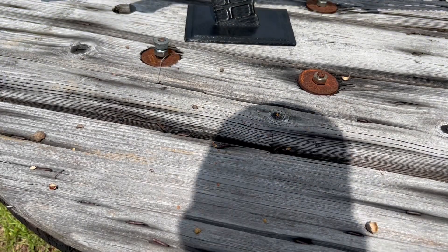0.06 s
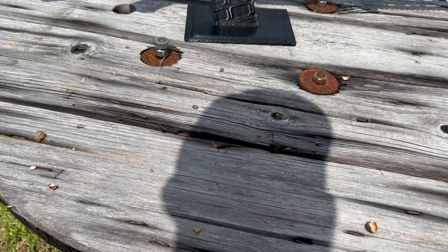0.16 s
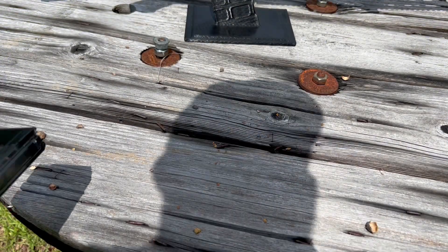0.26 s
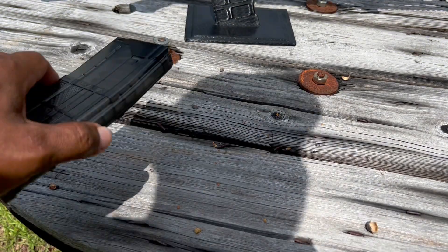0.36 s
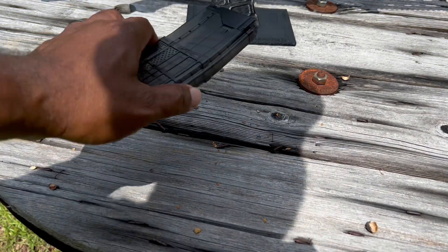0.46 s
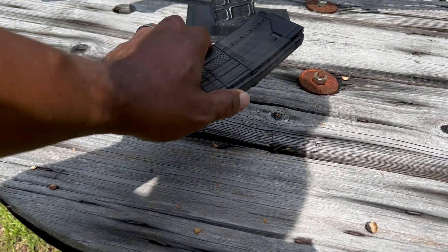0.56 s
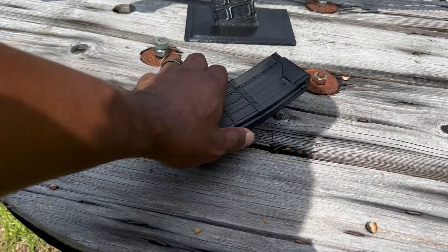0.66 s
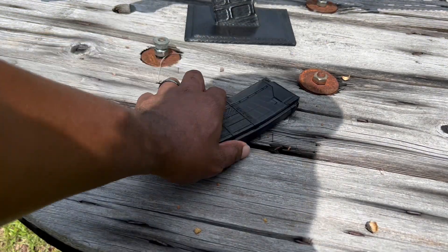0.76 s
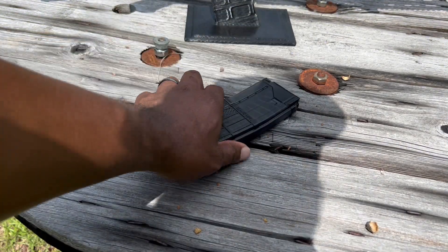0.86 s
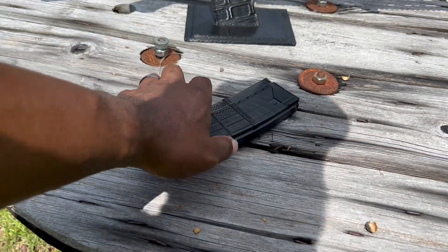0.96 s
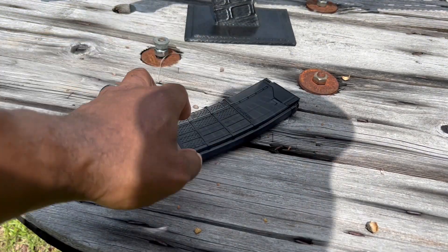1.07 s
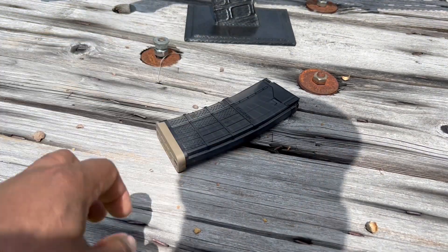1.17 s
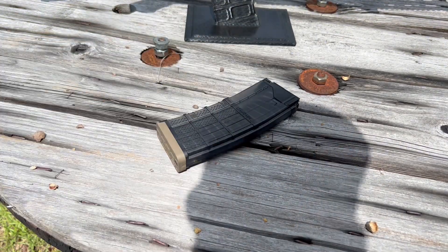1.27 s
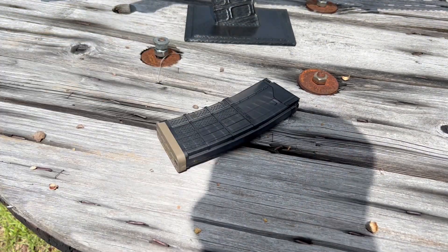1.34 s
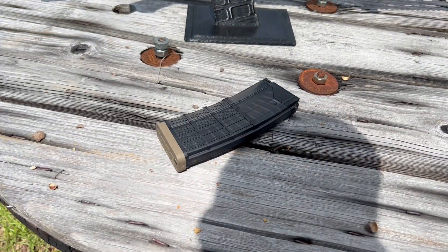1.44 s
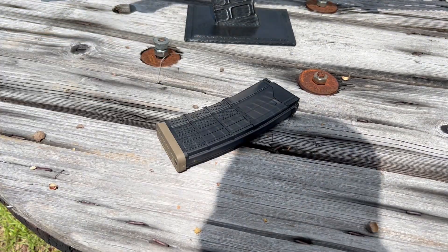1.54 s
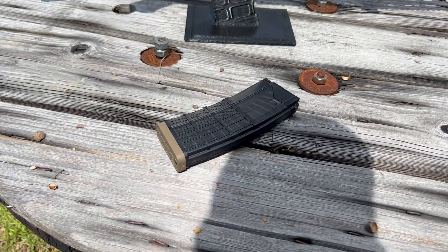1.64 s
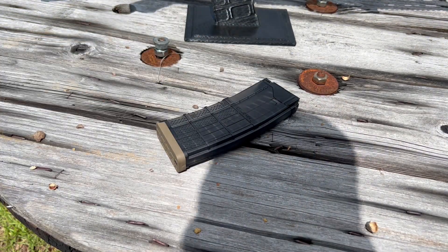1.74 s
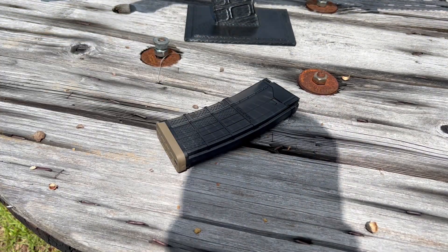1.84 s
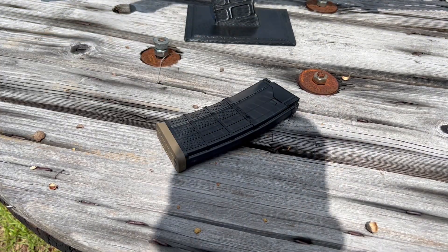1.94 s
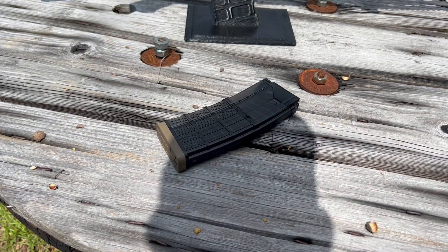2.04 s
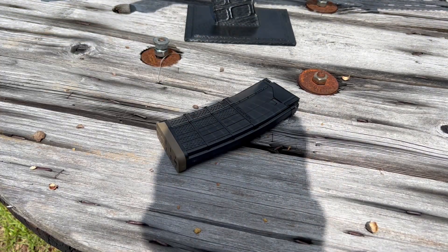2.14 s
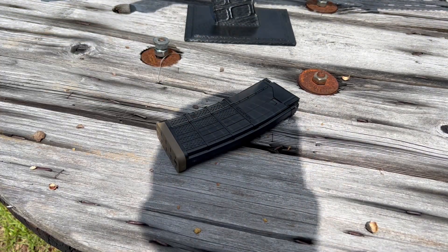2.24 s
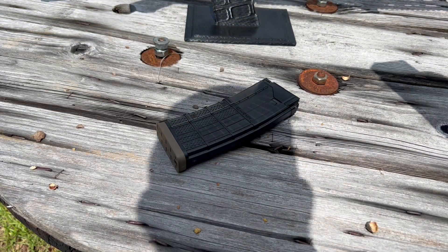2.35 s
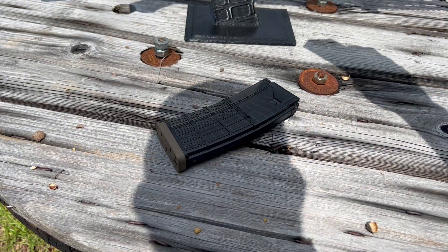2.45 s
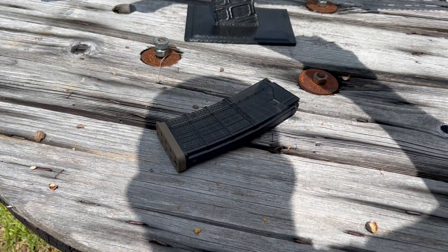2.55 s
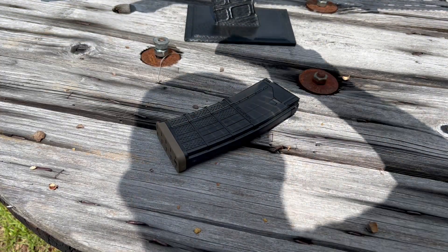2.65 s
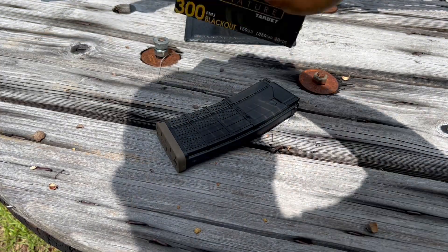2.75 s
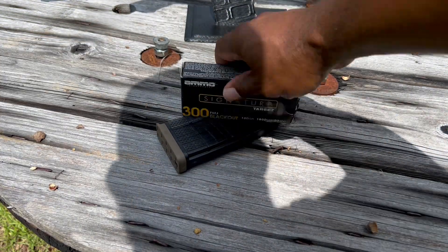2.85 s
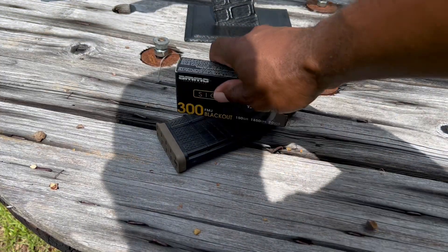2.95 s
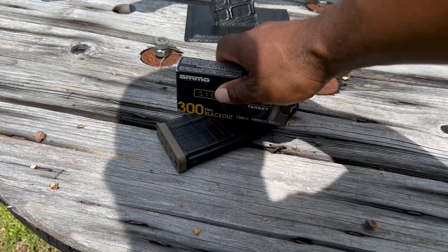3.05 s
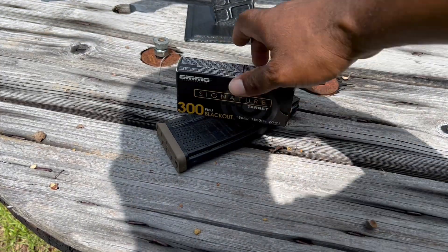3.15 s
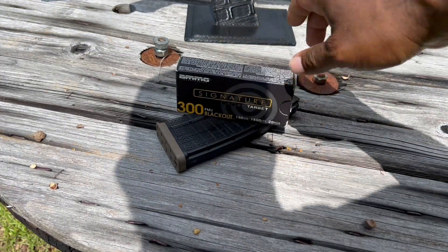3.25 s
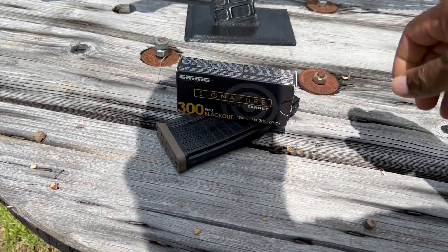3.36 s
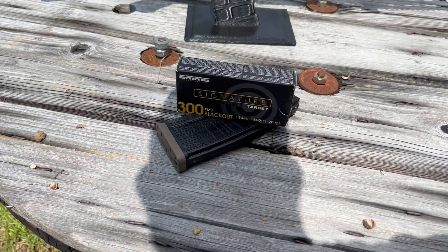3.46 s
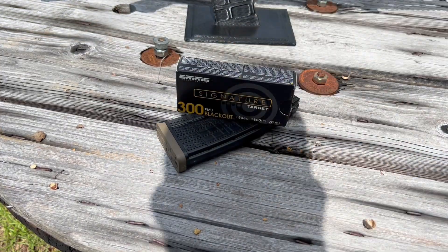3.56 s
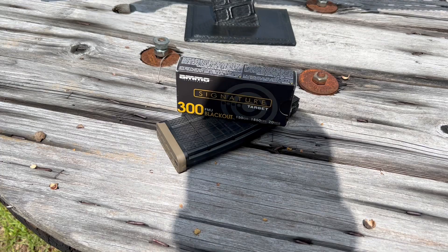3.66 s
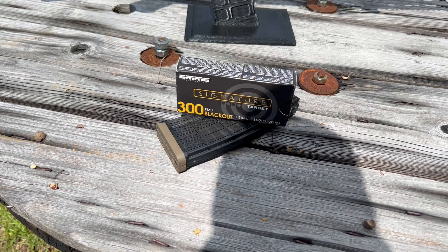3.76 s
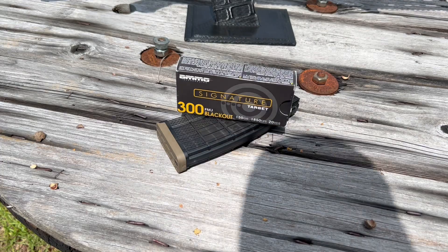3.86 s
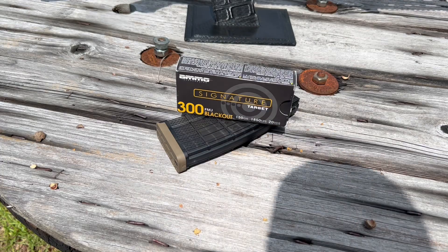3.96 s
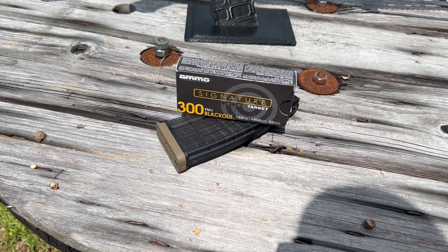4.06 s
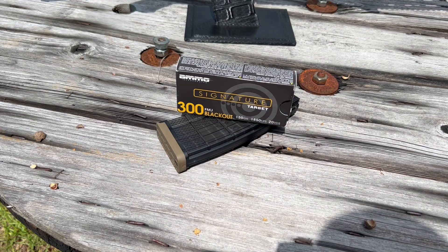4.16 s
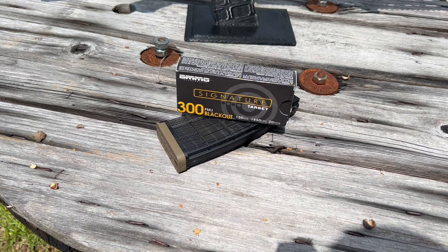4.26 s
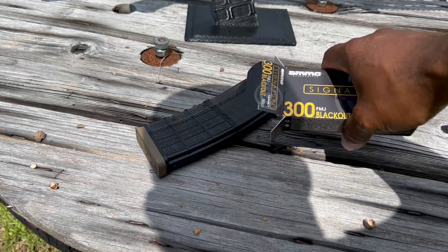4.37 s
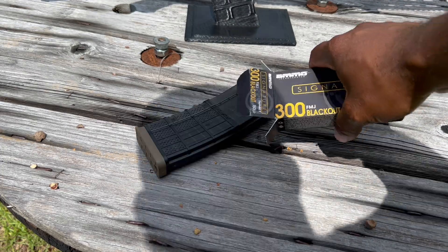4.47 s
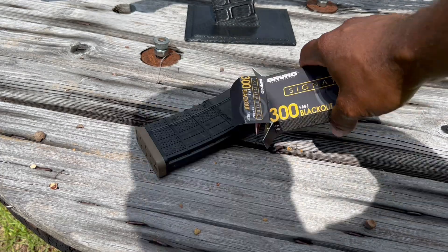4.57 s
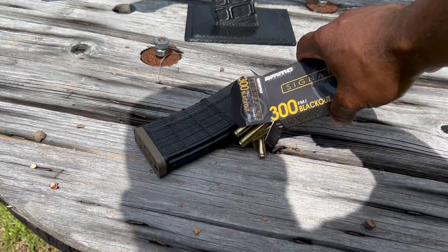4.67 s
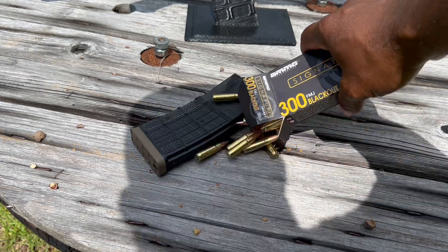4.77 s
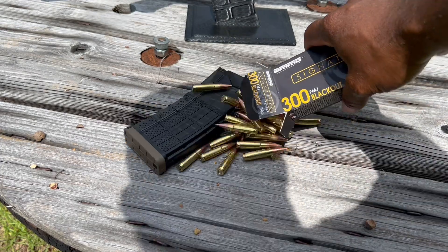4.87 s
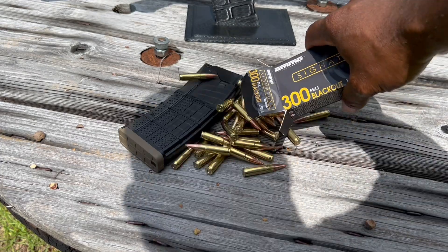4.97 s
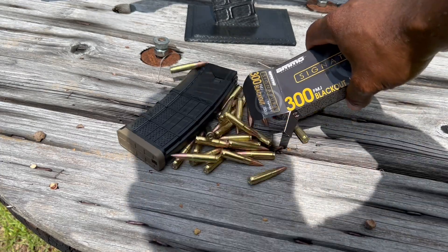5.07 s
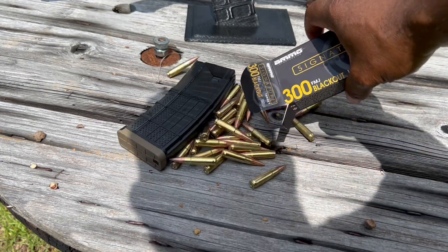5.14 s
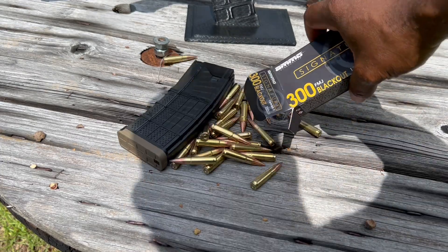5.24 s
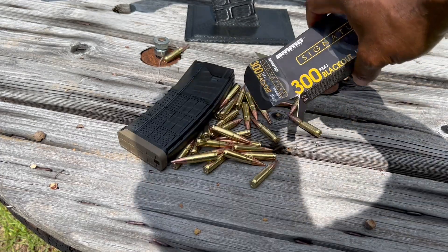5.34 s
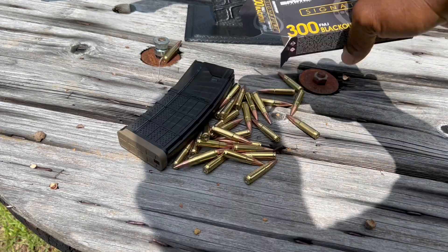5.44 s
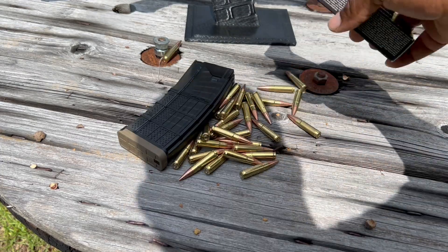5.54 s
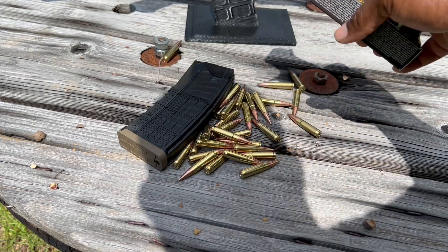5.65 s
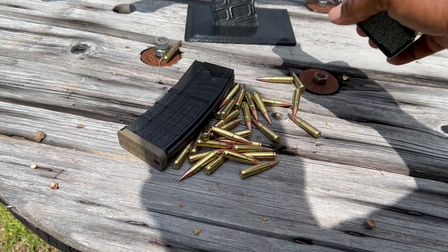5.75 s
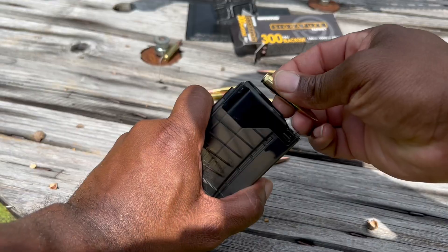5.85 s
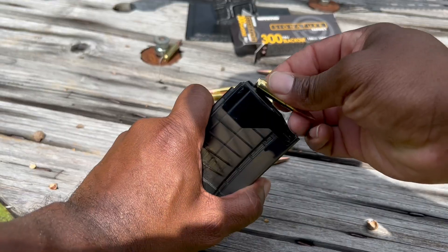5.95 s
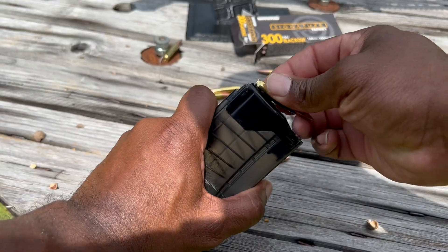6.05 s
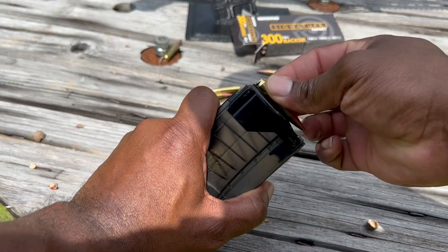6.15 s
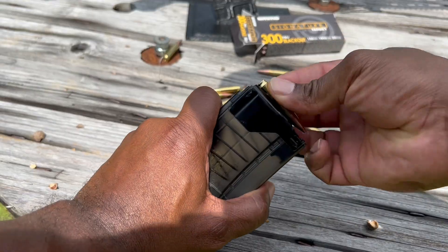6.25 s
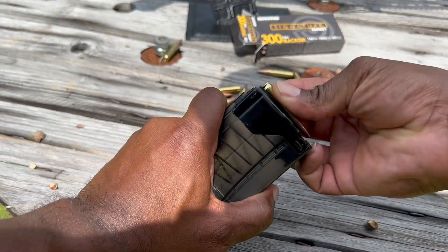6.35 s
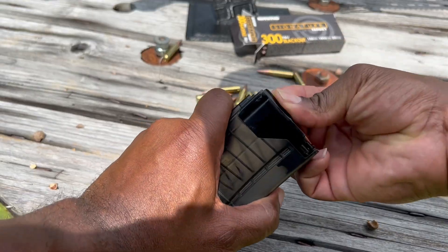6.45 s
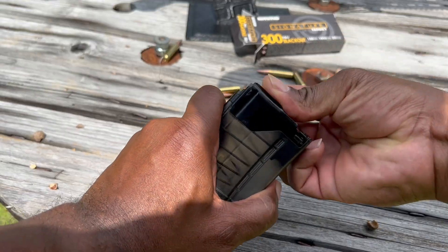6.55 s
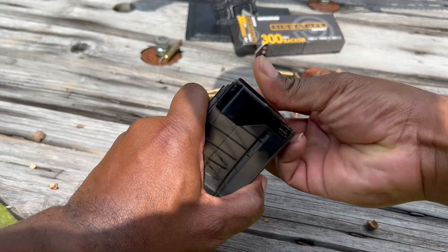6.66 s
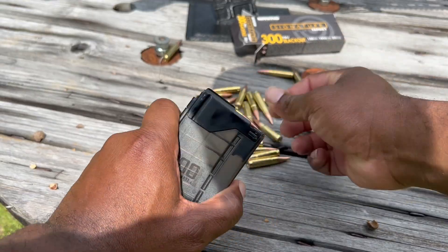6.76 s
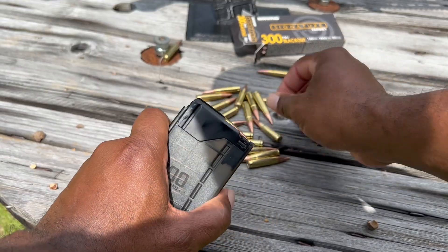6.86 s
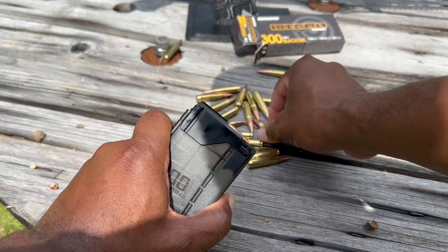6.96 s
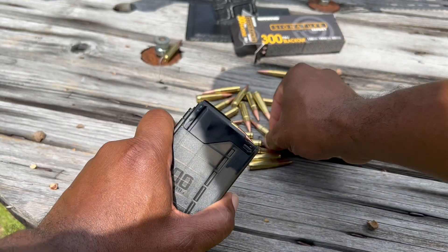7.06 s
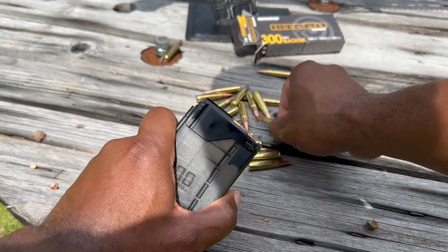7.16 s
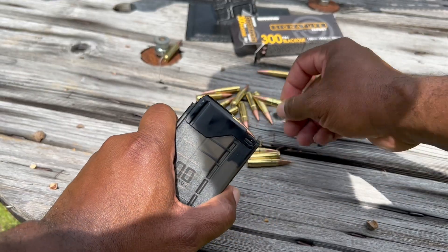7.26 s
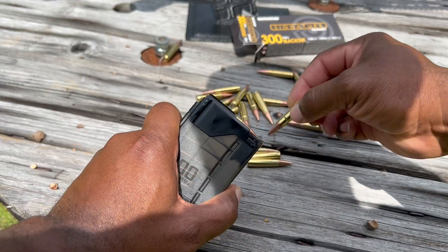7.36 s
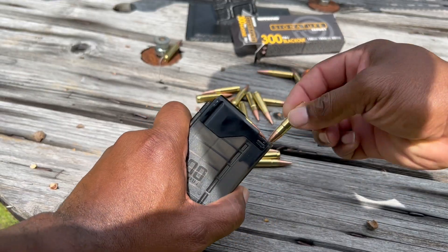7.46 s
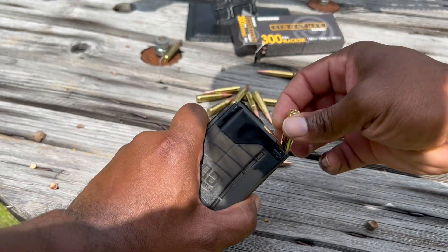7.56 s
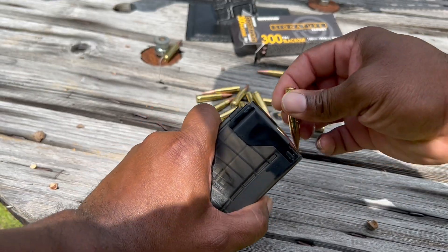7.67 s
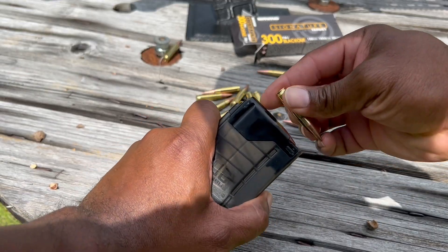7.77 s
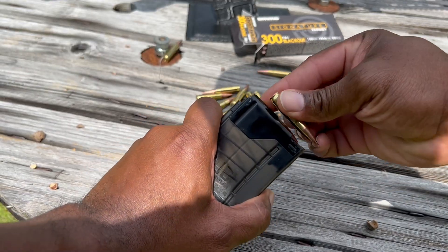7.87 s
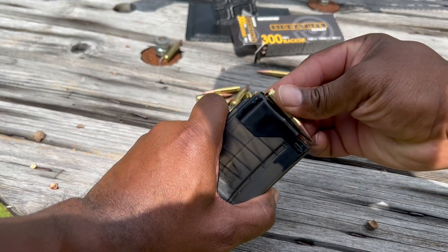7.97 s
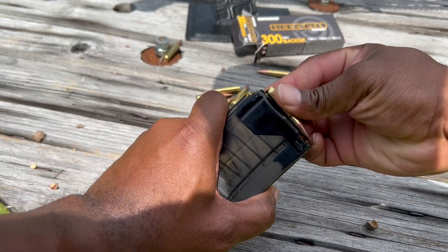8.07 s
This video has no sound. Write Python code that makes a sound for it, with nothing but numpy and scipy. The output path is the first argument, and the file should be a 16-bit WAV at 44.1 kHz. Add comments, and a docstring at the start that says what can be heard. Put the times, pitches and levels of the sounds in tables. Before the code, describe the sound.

Close stereo microphone outdoors at a weathered wooden table. A hollow polymer magazine lands hard and rocks briefly. After a quiet pause, a packed cardboard carton rattles and thuds down. Cartridges then tumble onto the planks in a bright, clattering cascade. Finally fingers rub plastic, one round snaps into the magazine, and another is picked from the heap, over faint wind and distant birds.

```python
"""Cartridges on a plank table

Outdoors, close stereo microphone: a polymer rifle magazine is put down, then a carton of cartridges, tipped out.
The brass rounds tumble over the wood and ring; one is pressed into the magazine, the next picked from the heap
and set on the lips. Light wind, far birds and the yard's echo lie behind.
Contacts are noise bursts with dying sines, rattles and rubbing are random grains, birds are gliding sines."""
import sys
import numpy as np
from scipy import signal
from scipy.fft import rfft, irfft, next_fast_len
from scipy.io import wavfile

SR = 44100
rng = np.random.default_rng(int(sys.argv[2]) if len(sys.argv) > 2 else 0)


def transcribe(u):
    """Save the signal u as a 16-bit wav file named by the first command-line argument.

    u: samples, shape (n,) or (channels, n), limited to [-1, 1]; the rate is SR.
    q: integer samples, one column per channel.
    """
    v = np.clip(np.atleast_2d(u).T, -1, 1)
    q = np.round(v * 32767).astype(np.int16)
    wavfile.write(sys.argv[1], SR, q)


N = 357651
TIME = np.arange(N) / SR
RING_TIME = TIME[:SR // 4]


def from_db(db):
    """Decibels to amplitude."""
    return 10 ** (np.asarray(db) / 20)


def rms_one(x):
    """Scale to an effective value of 1."""
    return x / np.sqrt(np.mean(x ** 2) + 1e-20)


def fade(t, t60):
    """Exponential decay, 60 dB down after t60 seconds."""
    return from_db(-60 * t / max(t60, 1e-3))


def at_hz(points, hz):
    """Read a spectrum table on a logarithmic frequency axis."""
    table_hz, values = np.array(points).T
    return np.interp(np.log(hz), np.log(table_hz), values)


def add(out, s, sound):
    """Mix a sound in at s seconds."""
    start = round(s * SR)
    out[:, start:start + sound.shape[1]] += sound[:, :N - start]


def band_pass(low, high):
    """Filter that passes low to high Hz."""
    return signal.butter(2, [low, high], "band", fs=SR, output="sos")


def drift(per_s):
    """Smooth random wander of spread 1."""
    knots = rng.standard_normal(int(TIME[-1] * per_s) + 2)
    return rms_one(np.interp(TIME * per_s, np.arange(len(knots)), knots))


EDGES = np.geomspace(22, 17800, 30)  # third octaves, Hz
BANDS = [(np.sqrt(low * high), band_pass(low, high)) for low, high in zip(EDGES, EDGES[1:])]
# left-right likeness of close sounds ahead of the microphone ports: (frequency [Hz], correlation)
LIKENESS = [(100, .98), (600, 0.98), (1400, .94), (3500, 0.57), (7000, 1), (15000, 0.41)]


def coloured(colour, envelope, likeness=LIKENESS):
    """Stereo noise in third octaves, each band under its own envelope(Hz)."""
    out = 0
    lowest_hz = colour[0][0]
    for hz, sos in BANDS:
        if hz > lowest_hz / 2:
            shape = envelope(hz)
            noise = rng.standard_normal((2, len(shape) + SR // 20))
            noise = signal.sosfilt(sos, noise)[:, -len(shape):]  # leave out the filter's start
            mid, side = map(rms_one, shape * noise)
            alike = np.clip(at_hz(likeness, hz), -1, 1)
            gain = from_db(at_hz(colour, hz)) * np.sqrt(hz) * min(1, hz / lowest_hz) ** 2
            out = out + gain * (np.sqrt(1 + alike) * mid + np.sqrt(1 - alike) * side * [[1], [-1]])
    return rms_one(out)


# strength of the wind at the microphone: (time [s], relative level [dB])
WIND = [(0, -81.5), (.6, -81.5), (.95, -65), (1.8, -83), (3.05, -63.5), (3.8, -69), (4.9, -62.5),
        (5.9, -64), (6.9, -67.5), (8.11, -61.5)]
# spectrum of the wind: (frequency [Hz], relative density [dB per Hz])
WIND_COLOUR = [(25, -14.5), (55, 3.5), (110, -1), (200, -15.5), (400, -19), (800, -37.5), (2000, -58)]
# spectrum of the open air: (frequency [Hz], relative density [dB per Hz])
AIR = [(59, -30.5), (100, -9.5), (177, -10.5), (210, -21), (424, -16), (502, -18), (570, -12.5),
       (818, -15.5), (970, -22), (1680, -8), (3780, -34), (6700, -21.5), (10000, -45.5), (12100, -32.5),
       (16000, -36.5)]
# left-right likeness of the diffuse air ahead of the ports: (frequency [Hz], correlation)
AIR_LIKENESS = [(100, 0.77), (550, 1), (1650, -.2), (5000, 0.47)]
# the background level dips briefly: (time [s], depth [dB])
LULLS = [(4.362, 17), (5.848, 30)]
AIR_DB, LULL_WIDTH_S = -70, 0.026
AIR_RISE_S, AIR_RISE_DB = 5.92, 1.5  # the background comes up a little and stays up


def outdoors(gust_db):
    """Steady far rustle, and lumpy wind at the microphone, both as coloured noise."""
    wind_db = np.interp(TIME, *np.transpose(WIND))
    dip_db = sum(db * np.exp(-((TIME - s) / LULL_WIDTH_S) ** 2) for s, db in LULLS)
    rise_db = AIR_RISE_DB * np.clip((TIME - AIR_RISE_S) / LULL_WIDTH_S, 0, 1)
    steady = lambda hz: np.ones(N)
    wind = from_db(wind_db + gust_db * drift(14)) * coloured(WIND_COLOUR, steady)
    rustle = from_db(AIR_DB) * coloured(AIR, steady, AIR_LIKENESS)
    return from_db(rise_db - dip_db) * (rustle + wind)


def echo(x, colour, t60):
    """Diffuse scatter from trees and ground that builds up and dies away."""
    t = TIME[:SR * 3 // 2]
    tail = coloured(colour, lambda hz: fade(t, t60) * (1 - fade(t, .15))) / np.sqrt(len(t))
    return signal.oaconvolve(x, tail, axes=1)[:, :N]


# one bird's short chirps: (time [s], length [s], first pitch [Hz], last pitch [Hz], relative level [dB])
CHIRPS = [(3.763, .045, 3900, 5250, -65.5), (3.799, 0.023, 5100, 3300, -65), (3.848, 0.01, 5450, 5450, -59),
          (3.912, 0.015, 5430, 5450, -54), (3.92, 0.016, 5500, 6150, -55.5)]
# another bird repeats one falling whistle: (time [s], length [s], relative level [dB])
SLURS = [(6.616, 0.22, -78), (6.862, 0.2, -80), (7.199, 0.22, -71.5), (7.778, 0.24, -69)]
SLUR_FROM_HZ, SLUR_TO_HZ = 6700, 3020


def birds(direct_db, scatter_db):
    """Far gliding whistles, each under one wavering arch of loudness, smeared by the trees."""
    song = np.zeros((1, N))
    slurs = [(s, length_s, SLUR_FROM_HZ, SLUR_TO_HZ, db) for s, length_s, db in SLURS]
    for s, length_s, first_hz, last_hz, db in [*CHIRPS, *slurs]:
        along = np.linspace(0, 1, int(length_s * SR))
        waver = 1 + .018 * drift(250)[:len(along)]
        hz = (first_hz + (last_hz - first_hz) * along) * waver
        loudness = from_db(db + 3.5 * drift(60)[:len(along)]) * np.sin(np.pi * along)
        whistle = loudness * np.sin(2 * np.pi * np.cumsum(hz) / SR)
        add(song, s, whistle[None])
    scatter = echo(song, [(3000, 0), (7000, 0)], t60=.55)
    return from_db(direct_db) * song + from_db(scatter_db) * scatter


# spectrum of the echo from the yard: (frequency [Hz], relative density [dB per Hz])
YARD = [(110, -4), (260, 10), (450, 5.5), (700, -20), (1500, -16.5), (3000, -19.5), (8000, -29),
        (16000, -42)]


def yard_echo(near):
    """The close sounds come back faintly as diffuse scatter from the yard."""
    return from_db(-41.0) * echo(near, YARD, t60=1.6)


# soft bumps of handling and of the table top: (time [s], relative peak level [dB])
THUDS = [(0.743, -22.5), (2.348, -60), (2.451, -44.5), (2.648, -48), (2.853, -27.5), (3.832, -47),
         (4.234, -45.5)]


def thuds(level_db, t60):
    """Soft, heavy bumps stir only the lowest modes."""
    out = np.zeros((2, N))
    colour = [(45, -9.5), (75, -1.5), (200, -5.5), (400, -16.5), (1500, -60)]
    for s, db in THUDS:
        bump = coloured(colour, lambda hz: fade(RING_TIME, t60))
        add(out, s, from_db(db + level_db) * bump / np.abs(bump).max())
    return out


def mode(hz, t60):
    """A dying sine, left and right out of step as far as the likeness at its pitch asks."""
    skew = np.arccos(np.clip(at_hz(LIKENESS, hz), -1, 1)) * rng.choice([-1, 1]) / 2
    phase = 2 * np.pi * hz * RING_TIME + np.array([[skew], [-skew]])
    return np.sin(phase) * fade(RING_TIME, t60)


REGISTERS = [band_pass(90, 750), band_pass(850, 2600), band_pass(3000, 19000)]  # bass, middle, treble


def response(colour, modes, contact_s, t60, damping, after_db, after_t60, modes_db, spot_db, spot_t60, spot_hz):
    """One contact: a crack of dense modes (highs die first) and clear rings, in three registers of equal energy."""
    def envelope(hz):
        t = RING_TIME * (hz / 1000) ** damping  # the decay times hold at 1 kHz
        return fade(t, t60) + from_db(after_db) * fade(t, after_t60) + 1e-12

    rings = 0
    for hz, db, ring_s in modes:  # no two contacts stir the modes quite alike
        gain = rng.choice([-1, 1]) * from_db(db + rng.normal(0, 3.3))
        rings = rings + gain * mode(hz * rng.normal(1, 0.0095), ring_s)
    spot = rms_one(mode(spot_hz, spot_t60))
    sound = coloured(colour, envelope) + from_db(modes_db) * rms_one(rings) + from_db(spot_db) * spot
    sound = sound * (1 - np.exp(-(RING_TIME / contact_s) ** 2))  # the surfaces take a moment to press home
    parts = [signal.sosfilt(sos, sound) for sos in REGISTERS]
    registers = np.array([sign * rms_one(part) for sign, part in zip([1, -1, 1], parts)])
    return registers * np.sqrt(.01 / RING_TIME[-1])


def contacts(rows, body, level_db, even_hz, tilt_db_per_octave):
    """Spots that ring below even_hz favour the body's bass, higher ones its middle; hard contacts add treble."""
    out = np.zeros((2, N))
    for s, db, hardness_db, spot_hz in rows:
        tilt_db = tilt_db_per_octave * np.log2(spot_hz / even_hz)
        weights = from_db([min(-tilt_db, 0), min(tilt_db, 0), hardness_db])
        add(out, s, from_db(db) * np.tensordot(weights, body(spot_hz), 1))
    return from_db(level_db) * out


def efforts(rows):
    """Each move swells, holds and dies away; gives the gain of its body sound and of its treble."""
    body = treble = 0
    for s, rise_s, hold_s, t60, db, treble_db in rows:
        swell = fade(np.maximum(s - TIME, 0), rise_s)
        dying = fade(np.maximum(TIME - s - hold_s, 0), t60)
        gain = from_db(db) * swell * dying
        body, treble = body + gain, treble + from_db(treble_db) * gain
    return body + 1e-12, treble + 1e-12


def grains(per_s, spread_db):
    """Random tiny contacts of uneven size."""
    sizes = from_db(spread_db * np.minimum(rng.exponential(1, N), 3)) * rng.choice([-1, 1], N)
    return sizes * (rng.random(N) < per_s / SR)


def struck(hits, body):
    """Every hit sets off the body's response."""
    return signal.oaconvolve(hits, body, axes=1)[:, :N]


# clear modes of the magazine: (frequency [Hz], nominal level [dB], decay t60 [s])
MAGAZINE_MODES = [(395, -9.5, 0.066), (555, -6, .1), (693, -5.5, .06), (1032, -9, 0.13),
                  (1360, -6.5, 0.068), (1537, -5, .045), (2120, -10, 0.048), (2340, -7.5, .06),
                  (2700, -14, 0.014), (4190, -11, 0.029), (4847, -12, 0.032), (6450, -9, 0.035),
                  (8940, -7, 0.025), (11200, 0.5, .018)]
# its dense, quickly damped modes: (frequency [Hz], relative density [dB per Hz])
MAGAZINE_COLOUR = [(110, -29), (260, -4.5), (650, 3), (1400, -8), (2400, -3.5), (3200, -9.5), (5000, -9.5),
                   (8500, -13), (12000, -9.5), (16000, -17.5)]


def magazine(spot_hz):
    """A stiff, hollow polymer shell."""
    return response(MAGAZINE_COLOUR, MAGAZINE_MODES, contact_s=0.00032, t60=0.033, damping=0.37,
                    after_db=-29.5, after_t60=0.16, modes_db=-4.5,
                    spot_db=-0.5, spot_t60=0.032, spot_hz=spot_hz)


# a sleeve swishing past, then fingers and brass sliding on the polymer: (time [s], swelling t60 [s],
# hold [s], dying t60 [s], murmur level [dB], hiss above that [dB])
RUB = [(.57, 0.52, .01, 0.26, -66, 4.5), (.9, 0.19, .03, 0.079, -57, -15),
       (5.96, 0.037, 0.0085, 0.17, -60, -16), (6.04, .04, .01, 0.58, -58, -13.5),
       (6.275, .08, 0.0043, 0.057, -54.5, -25), (6.455, 0.13, .005, 0.38, -42, -19),
       (6.69, 0.13, 0.0068, 0.21, -50, -22.5), (7.52, 0.056, 0.0044, 0.61, -56.5, -5),
       (7.65, 0.19, .005, 0.089, -55.5, -5.5), (8.07, 0.24, .005, .25, -60, -11.5)]


def swish_and_rubbing(per_s, spread_db, count=3):
    """Dense tiny slips through the magazine shell's response make the sleeve's swish and the sliding alike."""
    pressure, friction = efforts(RUB)
    murmur = hiss = 0
    for _ in range(count):
        slips = grains(per_s / count, spread_db)[None]
        bass, middle, treble = magazine(rng.uniform(160, 1200))
        murmur = murmur + struck(slips, bass + middle)
        hiss = hiss + struck(slips, treble)
    return pressure * rms_one(murmur) + friction * rms_one(hiss)


# the shell as it lands, then as brass snaps against it: (time [s], relative level [dB],
# hardness = treble above that level [dB], ring of the struck spot [Hz])
MAGAZINE_CLICKS = [(0.7445, -14.5, -4, 1492), (5.945, -38.5, 12, 1530), (5.9475, -38, -24, 1030),
                   (5.953, -35.5, -18, 1620), (6.0245, -45.5, 13, 774), (6.0285, -36.5, -33, 547),
                   (6.086, -49.5, -4, 710), (6.116, -50.5, -16, 654), (6.167, -51, -13, 560),
                   (6.262, -44.5, -14, 1530), (6.272, -37.5, -18.5, 1465), (6.324, -49.5, -3.5, 1350),
                   (6.4335, -32.5, -2, 810), (6.4403, -17.5, -24, 1384), (6.4443, -28.5, 18, 1450),
                   (6.4463, -19, -6, 755), (6.4475, -18, -29, 2196), (6.483, -37.5, -17, 600),
                   (6.54, -44.5, -7, 603), (6.573, -44, -23, 980), (6.678, -41, -15.5, 400),
                   (6.69, -41, -16, 830), (7.506, -26, -14.5, 756), (7.5068, -29.5, -27, 2160),
                   (7.5145, -31.5, -5.5, 695), (7.534, -34, -20, 677), (7.565, -32.5, -6, 720),
                   (7.612, -38, -5.5, 695), (7.966, -39, 0.5, 1200), (7.9668, -36, -9, 2435),
                   (8.062, -33, -17, 330)]


def magazine_clicks():
    """Single hard contacts sound the polymer shell."""
    return contacts(MAGAZINE_CLICKS, magazine, level_db=-5.5, even_hz=920, tilt_db_per_octave=9)


# clear modes of the carton: (frequency [Hz], nominal level [dB], decay t60 [s])
CARTON_MODES = [(450, -17, 0.027), (757, -2, 0.036), (963, -9, 0.069), (1450, -2.5, 0.014),
                (1800, -5.5, .04), (8400, -19, 0.045)]
# its dense, quickly damped modes: (frequency [Hz], relative density [dB per Hz])
CARTON_COLOUR = [(110, -16), (240, -4), (500, -6.5), (800, -5), (1500, -0.5), (2200, -9), (3500, -12),
                 (6000, -22.5), (8000, -16.5), (12000, -30), (16000, -33.5)]


def carton(spot_hz):
    """Dead cardboard, packed with rounds."""
    return response(CARTON_COLOUR, CARTON_MODES, contact_s=0.00063, t60=0.041, damping=0.085,
                    after_db=-27.0, after_t60=0.15, modes_db=-7.0,
                    spot_db=-3, spot_t60=0.035, spot_hz=spot_hz)


# rounds and fingers knocking the carton, and the carton being set down: (time [s], relative level [dB],
# hardness = treble above that level [dB], ring of the struck spot [Hz])
CARTON_KNOCKS = [(1.737, -55.5, -9.5, 1530), (1.96, -61, -1, 1300), (2.031, -52.5, -7, 1680),
                 (2.055, -52.5, -1, 1630), (2.143, -64, 7.5, 2550), (2.263, -63, 9, 2560),
                 (2.33, -44, -4, 1500), (2.38, -37.5, -12.5, 1680), (2.428, -26.5, -18, 1450),
                 (2.449, -27, -22, 1420), (2.517, -31.5, -16.5, 1260), (2.571, -37.5, -1.5, 1100),
                 (2.622, -43.5, -4, 1000), (2.655, -39, -17, 1470), (2.75, -53, -16, 1960),
                 (2.829, -40, -16.5, 1150), (2.8555, -17, 4, 1065), (2.8595, -12.5, -12.5, 660),
                 (2.875, -30, -10, 1240), (2.899, -28, -9.5, 1035), (3.252, -60.5, -29, 700),
                 (4.415, -39.5, -19.5, 1060), (4.443, -33.5, -6, 950), (4.478, -39.5, 6, 760),
                 (4.554, -29.5, -5.5, 900), (5.496, -25, -16.5, 900), (5.757, -42, -41.5, 600),
                 (5.815, -41, -22, 1000), (7.128, -41, -11, 600), (7.178, -48.5, -27, 600)]


def carton_knocks():
    """Knocks and the setting down sound the packed cardboard."""
    return contacts(CARTON_KNOCKS, carton, level_db=-6.0, even_hz=780, tilt_db_per_octave=13.5)


# overtones of a cartridge case: (multiple of its ring [ratio], relative level [dB])
CASE_MODES = [(0.998, -4), (1.008, -11), (1.62, -18)]


def case_ring(hz, t60):
    """A cartridge case rings, shorter the more it is held by its neighbours."""
    return sum(from_db(db) * mode(hz * multiple, t60) for multiple, db in CASE_MODES)


def jostle(moves, body, per_s, thinning, spread_db, bass_db, ring_db, case_hz, case_t60, count=6):
    """Several rounds knock about at once, each on its own spot of the body and with its own ring."""
    knocking, brass = efforts(moves)
    busy = np.clip((knocking / knocking.max()) ** thinning, .15, 1)  # knocks grow sparse as the rounds settle
    knocks = ticks = rings = 0
    for _ in range(count):
        hits = (grains(busy * per_s / count, spread_db) / np.sqrt(busy))[None]
        bass, middle, treble = body(rng.uniform(600, 1800))
        knocks = knocks + struck(hits, from_db(bass_db) * bass + middle)
        ticks = ticks + struck(hits, treble)
        rings = rings + struck(hits, case_ring(case_hz * rng.normal(1, .006), case_t60))
    return knocking * rms_one(knocks) + brass * (rms_one(ticks) + from_db(ring_db) * rms_one(rings))


# rounds shifting in the carton at each move: (time [s], swelling t60 [s], hold [s], dying t60 [s],
# knocking level [dB], brass above that [dB])
CARTON_RATTLE = [(2.33, 0.15, 0.009, .45, -46, -7), (2.448, 0.087, .005, .3, -38.5, -12.5),
                 (2.52, 0.13, .05, .1, -45, -13), (2.83, 0.087, .01, .2, -43, -12.5),
                 (2.875, 0.068, .005, .14, -23.5, -10.5), (2.93, 0.097, .05, 0.31, -45, -10.5),
                 (4.42, 0.1, .04, .2, -55.5, -15.5), (4.49, 0.12, .09, .2, -39.5, -11),
                 (4.64, 0.03, 0.15, .2, -31, -10)]


def carton_rattle():
    """Tightly held rounds knock the cardboard and ring briefly."""
    return jostle(CARTON_RATTLE, carton, per_s=410, thinning=0.13, spread_db=3.5, bass_db=-6,
                  ring_db=-3.5, case_hz=7630, case_t60=0.02)


# clear modes of the table: (frequency [Hz], nominal level [dB], decay t60 [s])
TABLE_MODES = [(252, -15, 0.11), (420, -21, 0.062), (458, -20, 0.23), (587, -8, 0.054), (655, 1.5, 0.055),
               (1367, -6, 0.043), (1510, -7.5, 0.02), (3850, -25.5, 0.086)]
# its dense, quickly damped modes: (frequency [Hz], relative density [dB per Hz])
TABLE_COLOUR = [(110, -15.5), (240, -4.5), (370, -7), (650, -1), (1000, -7), (1450, -8), (2100, -15),
                (3300, -18.5), (6000, -19.5), (8500, -15), (12000, -14.5), (16000, -26)]


def planks(spot_hz):
    """Weathered wood with brass lying on it."""
    return response(TABLE_COLOUR, TABLE_MODES, contact_s=0.0018, t60=.034, damping=.25,
                    after_db=-26, after_t60=0.29, modes_db=-5.5,
                    spot_db=-4.5, spot_t60=0.033, spot_hz=spot_hz)


ROCK_S, ROCK_GAP_S = .771, 0.023
ROCK_DB, ROCK_LOSS_DB, ROCK_HARDNESS_DB, ROCK_HZ = -27.5, 11.5, -16, 680


def rocking(count=4):
    """The dropped magazine rocks to rest on the planks in even, weakening bounces."""
    return [(ROCK_S + k * ROCK_GAP_S, ROCK_DB - k * ROCK_LOSS_DB, ROCK_HARDNESS_DB, ROCK_HZ * rng.uniform(.8, 1.2))
            for k in range(count)]


# things landing on the planks: (time [s], relative level [dB],
# hardness = treble above that level [dB], ring of the struck spot [Hz])
TABLE_KNOCKS = [(0.7325, -25, -13.5, 651.5), (0.743, -15, -11, 655), (0.7468, -15.5, -6.5, 850),
                (0.7615, -19, -11.5, 690), (4.6095, -12, -13.5, 1414), (4.653, -15.5, -10, 1450),
                (4.686, -12.5, -18, 1503), (4.7215, -18, -16, 1000), (4.754, -16.5, -6, 600),
                (4.762, -23.5, 2.5, 700), (4.774, -20.5, -9.5, 680), (4.788, -16, -6.5, 1460),
                (4.818, -17.5, -12.5, 950), (4.831, -19.5, -2, 900), (4.872, -22, -2, 740),
                (4.884, -17, -4, 1400), (4.964, -16.5, -5, 700), (4.999, -31.5, 9, 640),
                (5.023, -19, -36.5, 1010), (5.06, -22.5, -9.5, 2770), (5.199, -30.5, -31, 700),
                (5.257, -35.5, -33, 528), (5.2975, -51.5, 15.5, 1120), (5.374, -37, -30, 600),
                (5.523, -41.5, -16, 820), (7.25, -66, 10, 790)]


def table_knocks():
    """Landings and the rocking magazine sound the wood."""
    return contacts([*TABLE_KNOCKS, *rocking()], planks, level_db=-4.5, even_hz=700, tilt_db_per_octave=9.5)


# rounds spilling, pouring and settling on the planks, later stirred in the heap: (time [s],
# swelling t60 [s], hold [s], dying t60 [s], knocking level [dB], brass above that [dB])
HEAP_RATTLE = [(4.63, 0.033, 0.13, 0.35, -30, -16.5), (4.775, 0.1, 0.21, 0.85, -24, -7.5),
               (5.53, .3, .01, 0.41, -58, -24.5), (7.03, 0.084, .06, 0.51, -48.5, -6.5)]


def heap_rattle():
    """Tumbling rounds knock the wood and ring longer than in the carton."""
    return jostle(HEAP_RATTLE, planks, per_s=550, thinning=0.3, spread_db=4.5, bass_db=2,
                  ring_db=-0.5, case_hz=7460, case_t60=0.056)


# brass on brass: (time [s], relative level [dB], ring [Hz])
CLINKS = [(4.8254, -18.5, 7580), (4.8791, -21, 7700), (5.1622, -26.5, 7650), (5.2979, -27, 7560),
          (5.3381, -27, 7560), (5.382, -38.5, 7540), (5.5335, -44, 7360), (7.0532, -32, 7700),
          (7.1754, -56, 7580)]


def clinks(level_db):
    """Free cases strike each other and ring on."""
    out = np.zeros((2, N))
    for s, db, hz in CLINKS:
        ring = case_ring(hz, t60=0.12) * (1 - fade(RING_TIME, 0.007))
        add(out, s, from_db(db + level_db) * ring)
    return out


def scene():
    """Knocks, rattles, a swish and rubbing close by, with the yard's echo, birds and wind behind."""
    near = thuds(level_db=-6.5, t60=0.11) + swish_and_rubbing(per_s=1300, spread_db=3.5) + magazine_clicks()
    near = near + carton_knocks() + carton_rattle()
    near = near + table_knocks() + heap_rattle() + clinks(level_db=4.0)
    far = outdoors(gust_db=2.5) + birds(direct_db=-2, scatter_db=-2) + yard_echo(near)
    return near + far


# phase by which the left microphone port leads the right, before the bass taper: (frequency [Hz], lead [radians])
PORT_PHASE = [(0, 1), (1810, 0.39), (3190, 1.9), (3700, 0.46), (5340, 1.43), (6370, 0.57), (7410, 2),
              (10600, -3.8), (11800, -4.5), (12300, -6.5), (13500, -10.5), (14300, -10.5), (15200, -11.5),
              (16700, -11.5)]
PORTS_APART_HZ = 1800  # under this the waves are too long to reach the ports fully out of step


def ports(x):
    """The two microphone ports hear the higher frequencies out of step."""
    size = next_fast_len(N + SR // 10)
    hz = np.arange(size // 2 + 1) * SR / size
    lead = np.interp(hz, *np.transpose(PORT_PHASE)) * np.minimum(hz / PORTS_APART_HZ, 1)
    turn = np.exp(.5j * lead * np.array([[1], [-1]]))
    return irfft(rfft(x, size) * turn, size)[:, :N]


# hollows and a bump in the microphone's treble: (frequency [Hz], width [Hz], gain [dB])
MIC_COLOUR = [(10280, 2000, -12.5), (11900, 370, 1.5), (13700, 1300, -8)]
CUTOFF_HZ = 16050


def record(dry):
    """The microphone colours the treble; peaks are rounded and the top is cut."""
    dry = ports(dry)
    for hz, width_hz, db in MIC_COLOUR:
        b, a = signal.iirpeak(hz, hz / width_hz, fs=SR)
        dry = dry + (from_db(db) - 1) * signal.lfilter(b, a, dry)
    rounded = 1.241 * np.tanh(dry / 1.001)
    top_cut = signal.ellip(10, .3, 80, CUTOFF_HZ, fs=SR, output="sos")
    return signal.sosfilt(top_cut, rounded)


dry = scene()
out = record(dry)
transcribe(out)
```